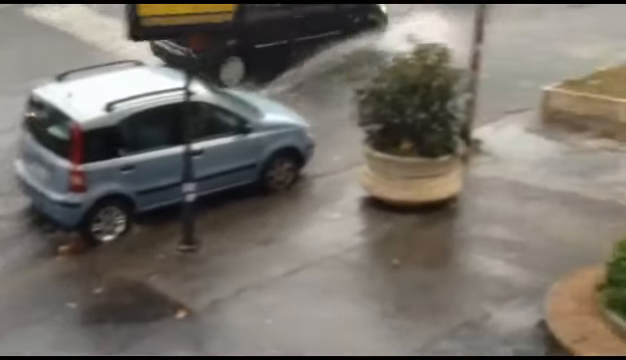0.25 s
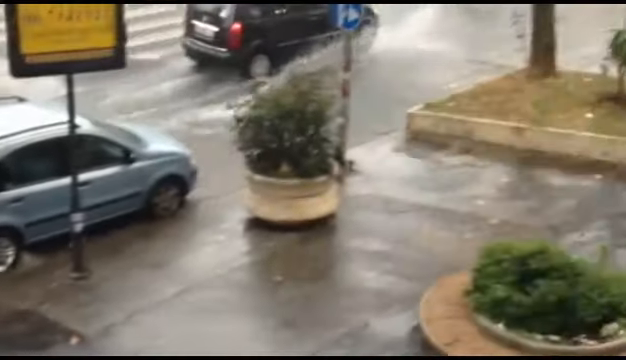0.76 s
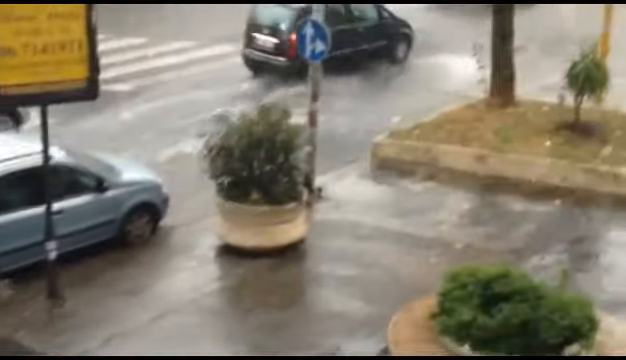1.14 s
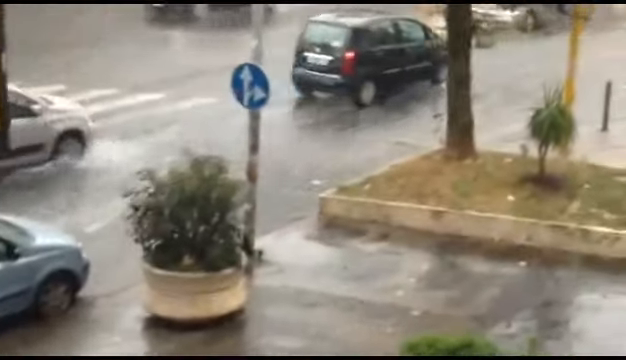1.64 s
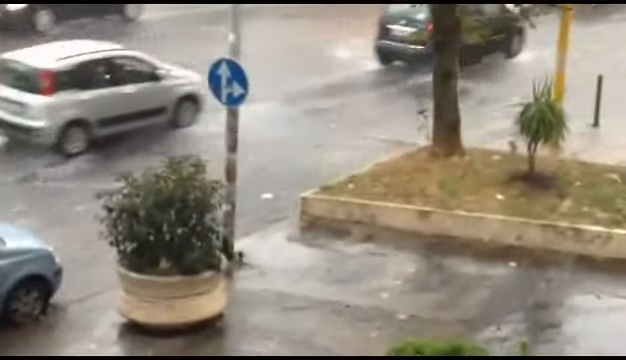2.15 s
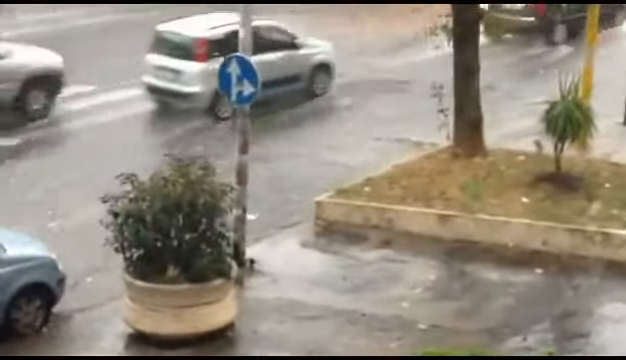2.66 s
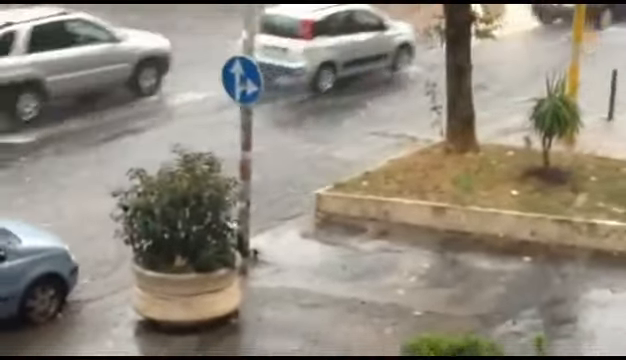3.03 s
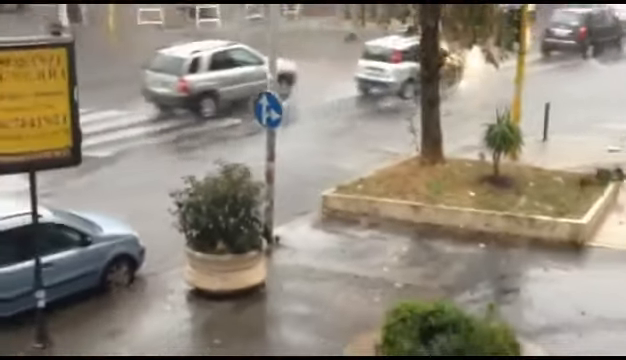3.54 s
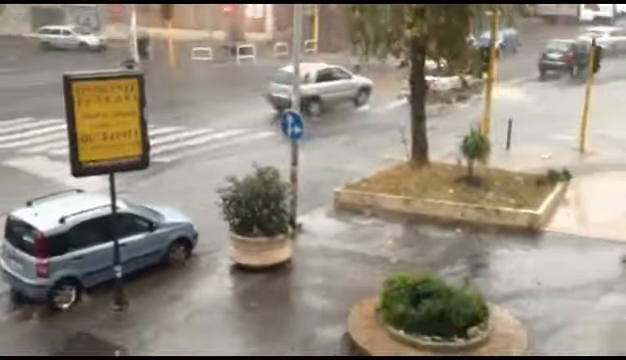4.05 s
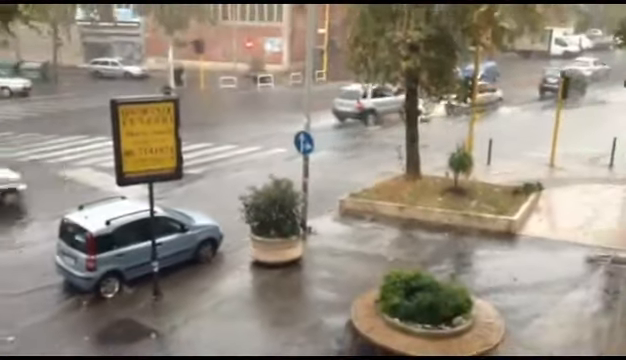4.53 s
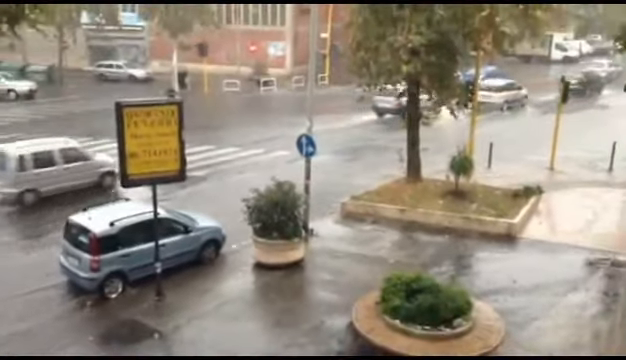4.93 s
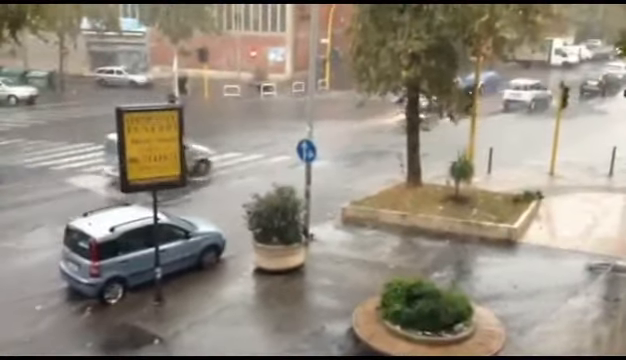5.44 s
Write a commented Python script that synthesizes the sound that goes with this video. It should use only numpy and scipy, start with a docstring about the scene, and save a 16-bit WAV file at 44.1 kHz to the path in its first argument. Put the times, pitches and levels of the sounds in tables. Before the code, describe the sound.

Steady heavy rain hisses and patters on paving while cars swish past on the wet road, with sharp drops snapping close to the microphone.

```python
"""Heavy rain on a paved street: a noise wash under patter, splats, ringing plips and heavy smacks.
Cars pass in hissing patchy noise with spatter, bubbles and mist, over a low roar and rolling rush.
Wavering sines make engine drones; narrow noise bands make singing treads.
Close drops are short decaying rings; low bumps are swelling and dying sines.
Sharp treble peaks can trip the recorder's gain control, which then creeps back up."""
import sys
import numpy as np
from scipy import signal
from scipy.fft import rfft, irfft
from scipy.io import wavfile
from scipy.ndimage import uniform_filter1d

SR = 44100
rng = np.random.default_rng(int(sys.argv[2]) if len(sys.argv) > 2 else 0)


def wrap_up_sound(samples):
    """Save the sound to the file named by the first command line argument, as 16-bit audio."""
    columns = np.atleast_2d(samples).T
    # keep every value between -1 and 1, then stretch to whole-number steps
    tamed = np.clip(columns, -1, 1)
    steps = np.round(tamed * 32767).astype(np.int16)
    wavfile.write(sys.argv[1], SR, steps)


N = 250929
TIME_S = np.arange(N) / SR

# rain strength: time_s, level_db
RAIN_LEVEL = [(0, -23.5), (0.7, -23), (1.05, -23.5), (1.4, -23), (1.5, -24), (1.8, -23), (2.33, -23.5),
              (2.75, -24.5), (3.0, -24), (3.65, -23), (3.97, -27), (4.75, -25.5), (5.2, -25.5),
              (5.65, -26.5)]
# rain spectrum: freq_hz, gain_db
RAIN_COLOUR = [(30, -54), (100, -30), (300, -7.5), (1000, 1.5), (2500, 1), (5000, -2), (8000, -2.5),
               (10000, -3.5), (12000, -6), (14000, -11), (15000, -30)]
# heavy drops smacking the paving, spectrum: freq_hz, gain_db
SMACK_COLOUR = [(200, -32), (700, -10), (1500, -0.5), (3000, 2), (6000, -3.5), (12000, -12)]
# passing cars: nearest_s, spray_db, mist_db, distance_m
CARS = [(0.6, -30, -39, 4.4), (1.96, -25.5, -50, 2.1), (2.33, -29, -34, 1.3), (3.14, -26, -34, 1.6),
        (3.53, -25, -33.5, 3.8), (4.97, -27.5, -33.5, 2.4), (5.55, -44, -33, 2.7)]
# tyre spray spectrum: freq_hz, gain_db
SPRAY_COLOUR = [(30, -64), (300, -25), (600, -0.5), (780, -3.5), (1100, -1.5), (2100, 3.5), (3000, 1),
                (4500, -2.5), (7000, -7), (15000, -27)]
# fine mist spectrum: freq_hz, gain_db
MIST_COLOUR = [(300, -45), (2000, -12), (3500, 4), (5500, 2), (8000, 0), (15000, -20)]
# low roar of engines: time_s, level_db
ROAR_LEVEL = [(0, -34.5), (0.3, -31), (0.45, -30.5), (1.0, -31), (1.3, -33), (1.5, -31.5), (2.75, -32),
              (3.0, -31.5), (3.2, -36), (3.4, -31.5), (3.8, -32), (4.6, -34), (4.78, -37), (4.9, -33.5),
              (5.65, -31.5)]
# engine roar spectrum: freq_hz, gain_db
ROAR_COLOUR = [(30, -45), (60, -32), (90, -24), (125, -11.5), (160, -3.5), (190, -4.5), (245, 1.3),
               (290, -3.5), (370, -1), (450, -7), (580, -2.5), (800, -11.5), (3000, -14.5), (15000, -64)]
# hollow rush of wheels: time_s, level_db
ROLL_LEVEL = [(0, -37), (0.8, -34), (1.3, -32.5), (2.0, -36), (2.7, -38.5), (3.55, -32), (3.8, -33),
              (4.35, -43), (4.5, -34), (5.0, -33.5), (5.65, -37)]
# rolling wheels spectrum: freq_hz, gain_db
ROLL_COLOUR = [(100, -48), (350, -10), (480, -1), (590, 0.5), (800, -1), (1100, 0.5), (1800, -9),
               (8000, -34)]
# soft low bumps: start_s, peak_db, pitch_hz
BUMPS = [(.14, -44, 100), (.45, -42, 95), (.66, -49, 85), (1.37, -31, 220), (1.84, -50, 85), (3.0, -53, 90),
         (3.665, -43, 90), (4.095, -53, 85), (4.185, -45, 88), (4.305, -47.5, 90), (4.84, -41, 90),
         (5.0, -55, 90)]
# drops beside the microphone: start_s, level_db, pitch_hz
CLOSE_DROPS = [(0.1625, -12, 4400), (0.8238, -6, 4560), (1.1235, -6, 4300), (1.4307, -4.5, 12000),
               (2.3055, -10, 4200), (2.6775, -13, 7800), (2.9115, -11, 7600), (3.0157, -5, 4400),
               (3.5322, -12, 5860), (3.6735, -1, 8550), (3.748, -6, 6600), (4.356, -16, 7400),
               (5.2795, -8, 5300), (5.5914, -7, 7500)]
# rings of a close drop: pitch_ratio, level_db, decay_s
DROP_MODES = [(0.5, -14, 0.0004), (0.72, -12, 0.0005), (1, -6.5, 0.0008), (1.52, -8, 0.0004)]
# close-drop splatter spectrum: freq_hz, gain_db
SPLATTER_COLOUR = [(100, -30), (2000, -19), (4500, 11), (8500, -20), (11000, 5), (15000, -12)]
# engine drones: start_s, end_s, pitch_hz, level_db
DRONES = [(.65, 1.205, 154.6, -41), (1.45, 2.11, 155, -42), (2.194, 2.48, 371.6, -40),
          (2.65, 3.15, 180, -43.5), (3.796, 4.557, 238, -45.5), (4.893, 5.398, 312, -39),
          (5.25, 5.68, 143, -48), (5.303, 5.686, 235, -46)]
# treads singing on the wet road: start_s, end_s, pitch_hz, level_db
TREADS = [(1.648, 2.448, 892, -35.5), (1.85, 2.41, 1124, -39), (2.899, 3.396, 1415, -36),
          (3.378, 3.65, 1113, -35), (3.698, 4.4, 1080, -38), (4.346, 4.896, 583, -39.5),
          (4.845, 5.65, 703, -40.5)]

CAR_SPEED_M_PER_S, FAR_SPRAY_DB = 8.3, -29
FLURRY_DB, FLURRY_TOP_HZ = 0.25, 23.86
DRONE_WANDER_RATIO = 0.027  # rms, as a share of the pitch
BAND_LIMIT_HZ, STOP_S = 15000, 5.669


def amp(db):
    """Decibels to gain."""
    return 10 ** (np.asarray(db) / 20)


def unit(x):
    """Scale to an rms of 1."""
    return x / np.sqrt(np.mean(x ** 2) + 1e-20)


def level(curve):
    """Gain per sample, interpolated in dB from a (time_s, level_db) curve."""
    return amp(np.interp(TIME_S, *np.transpose(curve)))


def tint(x, colour):
    """Filter by a (freq_hz, gain_db) spectrum, interpolated over log frequency."""
    freq_hz, gain_db = np.transpose(colour)
    bins_hz = np.fft.rfftfreq(len(x), 1 / SR)
    gain = amp(np.interp(np.log(bins_hz + 1), np.log(freq_hz), gain_db))
    return irfft(rfft(x) * gain, len(x))


def add(mix, start_s, sound):
    """Mix a sound in place, cut at the end of the mix."""
    part = mix[max(round(start_s * SR), 0):][:len(sound)]
    part += sound[:len(part)]


def waver(depth_db, top_hz, count=30):
    """Random gain of rms depth_db: sines from top_hz / 4 to top_hz in random phase."""
    rates_hz = np.geomspace(top_hz / 4, top_hz, count)
    phases = rng.random(count)
    coarse_s = TIME_S[::128]
    swing = np.zeros(len(coarse_s))
    for rate_hz, phase in zip(rates_hz, phases):
        swing += np.sin(2 * np.pi * (rate_hz * coarse_s + phase)) / np.sqrt(rate_hz)
    return amp(depth_db * np.interp(TIME_S, coarse_s, unit(swing)))


def patchy_noise(patch_db, size):
    """Noise whose level wanders by patch_db rms in patches of size (frames, bins)."""
    real, imag, patches = rng.standard_normal((3, N // 256 + 5, 513))
    patches = uniform_filter1d(patches, size[0], axis=0)
    patches = unit(uniform_filter1d(patches, size[1], axis=1))
    spectra = (real + 1j * imag) * amp(patch_db * patches)
    return signal.istft(spectra.T, nperseg=1024, noverlap=768)[1][:N]


def splashes(per_s, spread_db, low_hz, high_hz, cycles, count=32):
    """Random drops, each a sine burst at one of count pitches, decaying by 1/e in `cycles` cycles."""
    t_s, out = np.arange(1024) / SR, np.zeros(N)
    sizes = amp(spread_db * np.minimum(rng.exponential(1, N), 4))
    landed = rng.random(N) < per_s / SR
    hits = sizes * rng.choice([-1, 1], N) * landed
    pitch_index = rng.integers(0, count, N)
    for k, pitch_hz in enumerate(np.linspace(low_hz, high_hz, count)):
        burst = np.exp(-t_s * pitch_hz / cycles) * np.sin(2 * np.pi * pitch_hz * t_s)
        out += signal.oaconvolve(hits * (pitch_index == k), unit(burst))[:N]
    return unit(out)


def street(x, wet_db, t60_s):
    """House fronts scatter the drops: a diffuse noise tail follows the dry power."""
    decay = amp(-60 * np.arange(SR // 2) / SR / t60_s) ** 2
    power = abs(signal.oaconvolve(x ** 2, decay / decay.sum())[:N])
    return x + amp(wet_db) * np.sqrt(power) * rng.standard_normal(N)


def rain():
    """Far drops merge into a wash; nearer ones patter and splat on paving and plip in puddles."""
    wash = unit(patchy_noise(patch_db=1.5, size=(5, 16)))
    patter = splashes(per_s=2400, spread_db=0.5, low_hz=1140, high_hz=12000, cycles=1.6)
    plips = splashes(per_s=300, spread_db=3.0, low_hz=1182, high_hz=7750, cycles=18.0)
    splats = splashes(per_s=260, spread_db=0.0, low_hz=670, high_hz=3220, cycles=0.59, count=10)
    drops = amp(-8.5) * patter + amp(-13.5) * splats + amp(-17.5) * plips
    near = street(drops, wet_db=-1.5, t60_s=0.064)
    gain = level(RAIN_LEVEL) * waver(depth_db=0.33, top_hz=10)
    return gain * unit(tint(wash + near, RAIN_COLOUR))


def smacks(per_s=40, ring_s=0.0064, crack_db=-2, crack_s=0.0009, smack_db=-11):
    """Heavy drops of equal size crack on the paving; each splash is noise that dies away."""
    t_s = np.arange(2048) / SR
    hits = (rng.random(N) < per_s / SR).astype(float)
    shape = np.exp(-t_s / ring_s) + amp(crack_db) * np.exp(-t_s / crack_s)
    power = abs(signal.oaconvolve(hits, shape ** 2)[:N])
    bursts = np.sqrt(power) * rng.standard_normal(N)
    return amp(smack_db) * level(RAIN_LEVEL) * unit(tint(bursts, SMACK_COLOUR))


def passing():
    """Spray and mist gains: each car falls off as one over distance; far spray adds a floor."""
    spray_power, mist_power = amp(FAR_SPRAY_DB) ** 2, 0
    for nearest_s, spray_db, mist_db, distance_m in CARS:
        along_m = CAR_SPEED_M_PER_S * (TIME_S - nearest_s)
        nearness = 1 / (1 + (along_m / distance_m) ** 2)
        spray_power = spray_power + amp(spray_db) ** 2 * nearness
        mist_power = mist_power + amp(mist_db) ** 2 * nearness
    return np.sqrt(spray_power), np.sqrt(mist_power)


def tyres():
    """Treads squeeze water off the road in a hiss; drops spatter and bubble, mist adds treble."""
    hiss = unit(patchy_noise(patch_db=1.65, size=(18, 3)))
    spatter = splashes(per_s=700, spread_db=1.0, low_hz=930, high_hz=4590, cycles=2.05)
    bubbles = splashes(per_s=170, spread_db=1.0, low_hz=871, high_hz=3099, cycles=130, count=24)
    mist = splashes(per_s=2800, spread_db=3.0, low_hz=3080, high_hz=8000, cycles=3.4, count=12)
    water = hiss + amp(-11) * spatter + amp(-12) * bubbles
    spray_gain, mist_gain = passing()
    spray = spray_gain * unit(tint(water, SPRAY_COLOUR))
    return spray + mist_gain * unit(tint(mist, MIST_COLOUR))


def traffic():
    """Dull roar of engines and, above it, the hollow rush of rolling wheels: two patchy noises."""
    roar = tint(patchy_noise(patch_db=2.04, size=(14, 2)), ROAR_COLOUR)
    rush = tint(patchy_noise(patch_db=2.7, size=(16, 2)), ROLL_COLOUR)
    return level(ROAR_LEVEL) * unit(roar) + level(ROLL_LEVEL) * unit(rush)


def bumps(rise_s=0.0081):
    """Dull thuds: low sines that swell for rise_s, then die away."""
    t_s, out = np.arange(SR // 5) / SR, np.zeros(N)
    envelope = t_s / rise_s * np.exp(1 - t_s / rise_s)
    for start_s, peak_db, pitch_hz in BUMPS:
        add(out, start_s, amp(peak_db) * envelope * np.sin(2 * np.pi * pitch_hz * t_s))
    return out


def close_drops(splatter_db=-23, splatter_rise_s=0.0024):
    """A sharp slap of very short rings, then a little noise splatter."""
    t_s, out = np.arange(1024) / SR, np.zeros(N)
    envelope = t_s / splatter_rise_s * np.exp(1 - t_s / splatter_rise_s)
    for start_s, level_db, pitch_hz in CLOSE_DROPS:
        slap = np.zeros(len(t_s))
        for k, (ratio, ring_db, decay_s) in enumerate(DROP_MODES):
            ring = np.exp(-t_s / decay_s) * np.sin(2 * np.pi * pitch_hz * ratio * t_s)
            slap += (-1) ** k * amp(ring_db) * ring  # alternate polarity
        noise = unit(tint(rng.standard_normal(len(t_s)), SPLATTER_COLOUR))
        splatter = amp(splatter_db) * noise * envelope
        add(out, start_s, amp(level_db) * (slap + splatter))
    return out


def drones(sag_per_s=0.042, flutter_db=2.0):
    """Engine tones of wandering pitch and level that swell, sag in pitch and fade as cars go by."""
    out = np.zeros(N)
    for start_s, end_s, pitch_hz, level_db in DRONES:
        t_s = np.arange(0, end_s - start_s, 1 / SR)
        slow_noise = uniform_filter1d(rng.standard_normal((2, 2 * SR)), size=700)
        wander, flutter = slow_noise[:, :len(t_s)]
        sag = sag_per_s * (t_s - t_s.mean())
        moving_hz = pitch_hz * (1 - sag + DRONE_WANDER_RATIO * unit(wander))
        tone = amp(flutter_db * unit(flutter)) * np.sin(2 * np.pi * np.cumsum(moving_hz) / SR)
        add(out, start_s, amp(level_db) * unit(tone) * signal.windows.tukey(len(tone), 0.6))
    return out


def treads(width_hz=45, sag_per_s=0.0405):
    """Tread blocks beat on the road: a breathy noise band swells, sinks in pitch and fades."""
    out = np.zeros(N)
    smooth = signal.butter(2, width_hz / 2, fs=SR, output="sos")
    for start_s, end_s, pitch_hz, level_db in TREADS:
        t_s = np.arange(0, end_s - start_s, 1 / SR)
        real, imag = signal.sosfilt(smooth, rng.standard_normal((2, 2 * SR)))[:, :len(t_s)]
        moving_hz = pitch_hz * (1 - sag_per_s * (t_s - t_s.mean()))
        phase = 2 * np.pi * np.cumsum(moving_hz) / SR
        song = unit(real * np.cos(phase) + imag * np.sin(phase))
        add(out, start_s, amp(level_db) * song * signal.windows.tukey(len(t_s), 0.6))
    return out


def scene():
    """Sum of all sources, the same in both channels; the water comes in quick, uneven flurries."""
    water = waver(FLURRY_DB, FLURRY_TOP_HZ) * (rain() + smacks() + tyres())
    mono = water + traffic() + bumps() + close_drops() + drones() + treads()
    return np.array([mono, mono])


def gain_control(x, depth_db=3.5, recover_db_per_s=6.0):
    """A sharp treble peak cuts the gain within a few milliseconds; it recovers slowly."""
    band = signal.butter(2, [7000, 10500], "band", fs=SR, output="sos")
    treble = signal.sosfilt(band, x.mean(axis=0))
    peaks = np.sqrt(abs(uniform_filter1d(treble ** 2, size=22)))
    tripped = np.clip((peaks - 0.165) / 0.02, 0, 1)
    recovery_db = recover_db_per_s * TIME_S
    # running maximum holds the deepest cut while it recovers
    cut_db = np.maximum.accumulate(depth_db * tripped + recovery_db) - recovery_db
    attack = np.ones(SR // 250) / (SR // 250)  # 4 ms average
    return x * amp(-signal.oaconvolve(cut_db, attack)[:N])


def record(dry):
    """Gain control, a 4 ms closing fade, then the band limit."""
    fade = np.clip((STOP_S - TIME_S) / 0.004, 0, 1)
    lowpass = signal.firwin(401, BAND_LIMIT_HZ, window=("kaiser", 9), fs=SR)
    return signal.oaconvolve(gain_control(dry) * fade, lowpass[None], "same")


dry = scene()
out = record(dry)
wrap_up_sound(out)
```